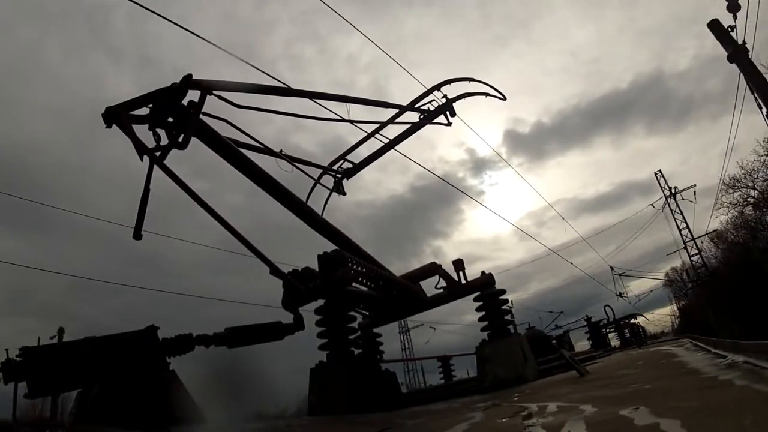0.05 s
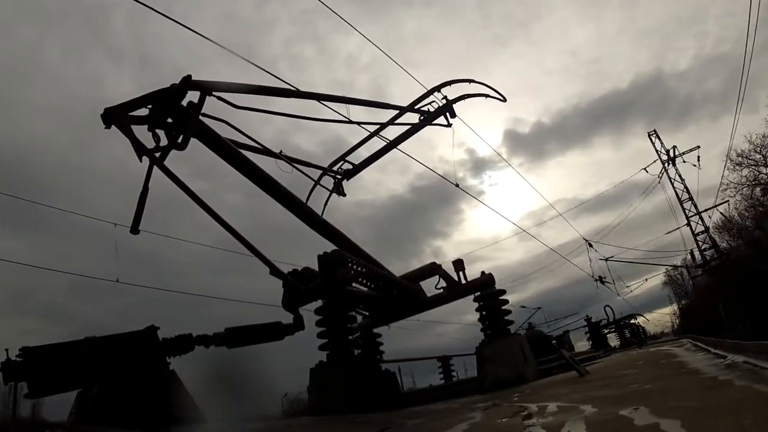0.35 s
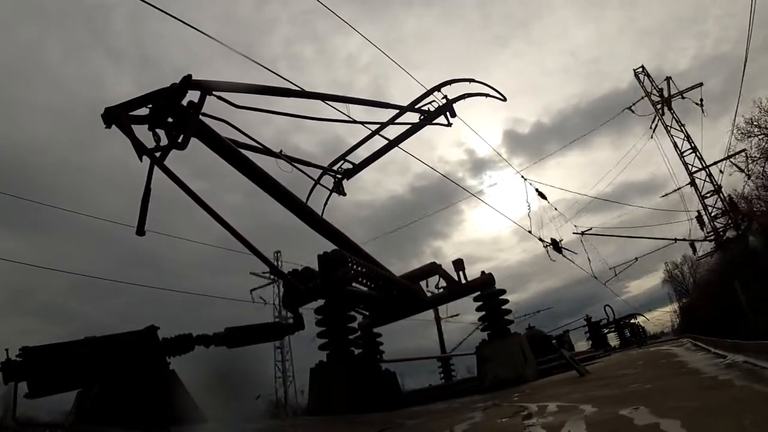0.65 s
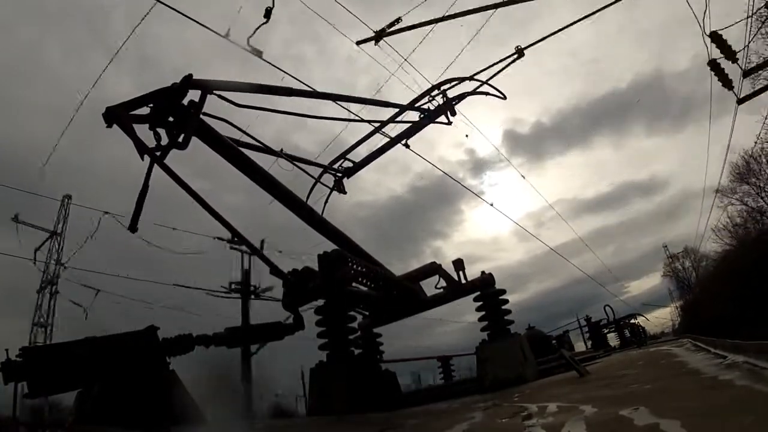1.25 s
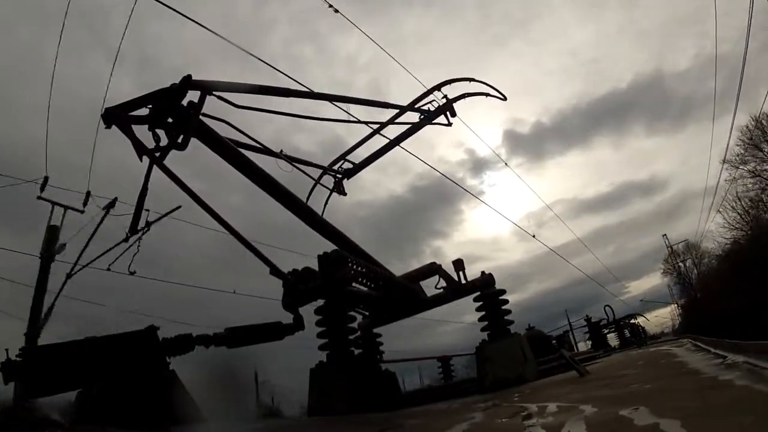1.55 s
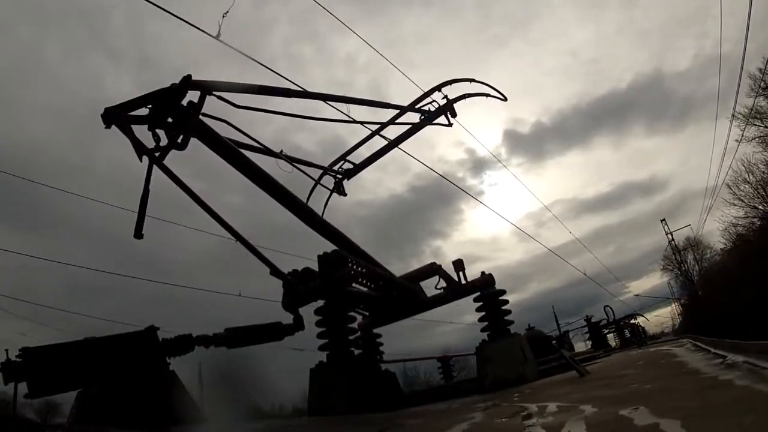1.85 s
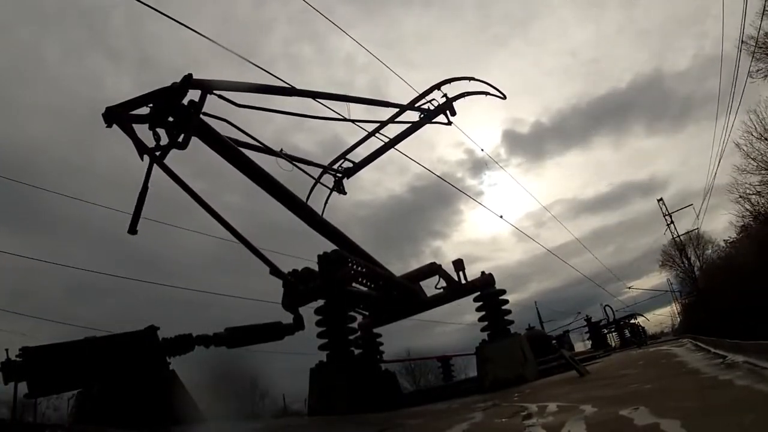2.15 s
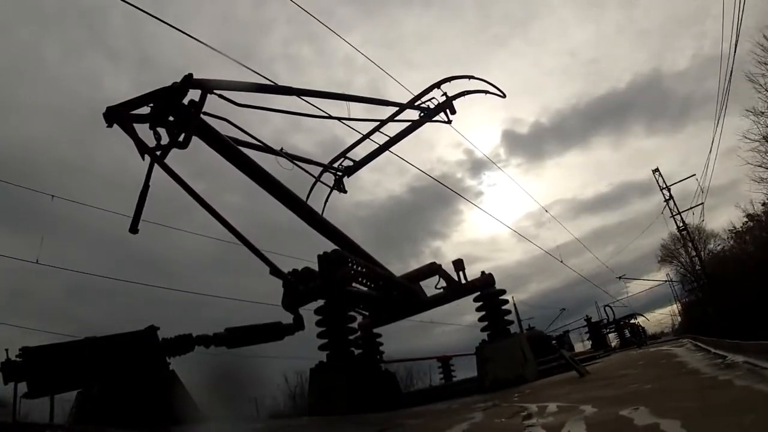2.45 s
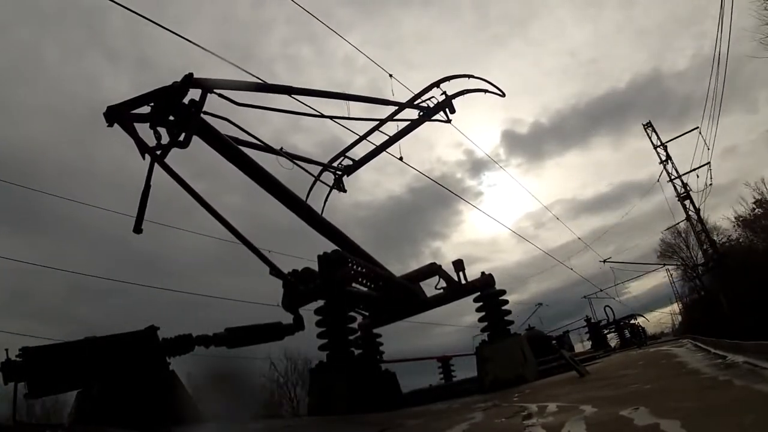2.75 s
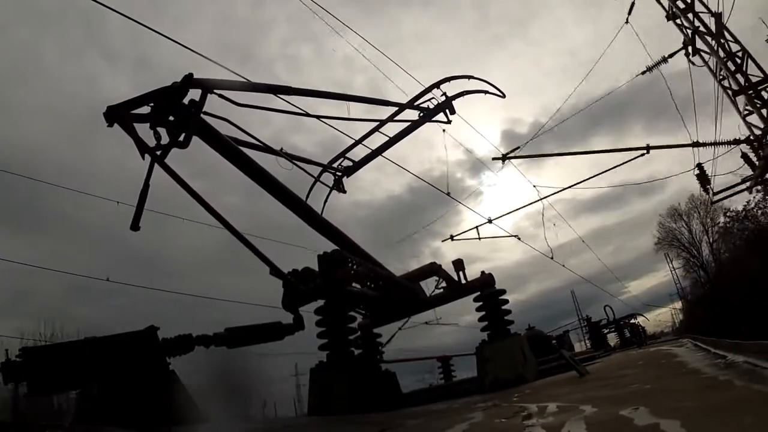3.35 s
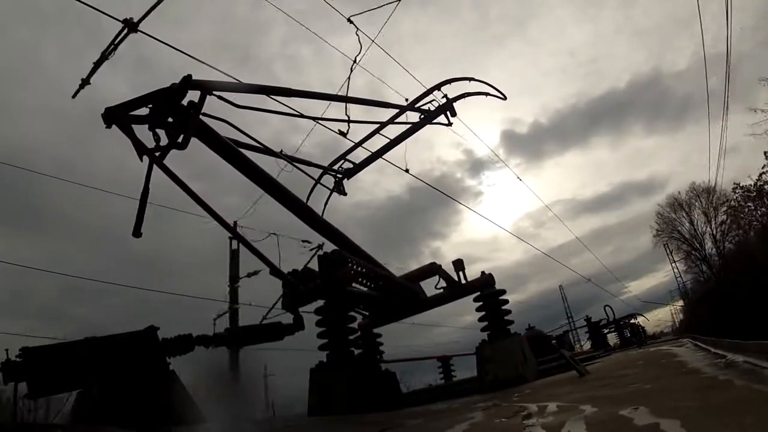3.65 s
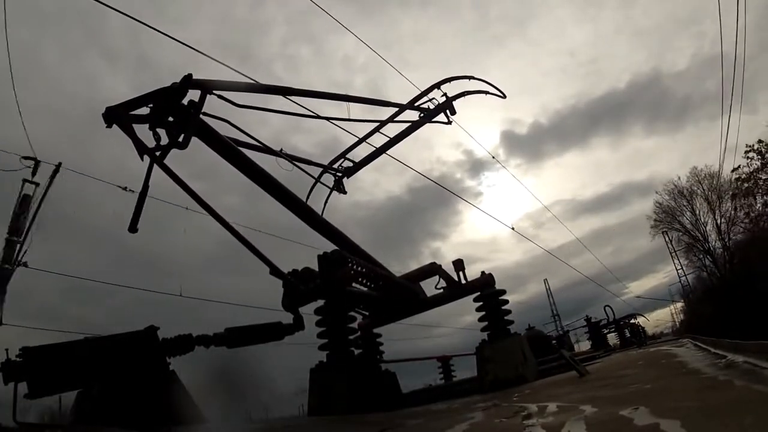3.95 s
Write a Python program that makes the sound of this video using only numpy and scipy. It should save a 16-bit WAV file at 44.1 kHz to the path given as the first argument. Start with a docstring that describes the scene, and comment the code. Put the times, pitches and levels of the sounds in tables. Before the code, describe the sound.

An electric train rushes along in the wind as an arc buzzes briefly and sparks snap.

```python
"""Wind buffets the microphone, wheels and air rush, and the airflow sings near 500 Hz in the roof gear
of a moving electric train. The pantograph scrapes faintly along the overhead wire. After a second it
draws an arc that buzzes at twice the mains rate, crackles and sizzles; each discharge heats the air
into a pop. A few lone sparks snap, most of them later on.
A limiter ducks the level after the loudest cracks."""
import sys
import numpy as np
from scipy import signal
from scipy.fft import rfft, irfft
from scipy.io import wavfile

SR = 44100
rng = np.random.default_rng(int(sys.argv[2]) if len(sys.argv) > 2 else 0)


def digitize_waveform(pressure):
    """Quantize a signal to 16-bit integers and store it at the path in sys.argv[1].

    Rows of a 2-D input are taken as channels; values are limited to [-1, 1].
    """
    field = np.atleast_2d(pressure).T
    bounded = np.clip(field, -1, 1)
    quanta = np.round(bounded * 32767).astype(np.int16)
    wavfile.write(sys.argv[1], SR, quanta)


N = 176400

# strength of the arc: (time [s], level [dB])
ARC_STRENGTH = [(1.09, -32), (1.102, -3), (1.114, -12), (1.128, -1.5), (1.142, -18), (1.153, 0.5),
                (1.176, 3), (1.2, 3), (1.217, 9.5), (1.23, -2.5), (1.255, 1), (1.275, -0.5), (1.303, 4.5),
                (1.31, -23)]
# dull pop of heated air: (frequency [Hz], relative spectral level [dB])
POP_SPECTRUM = [(40, -6), (100, 7.5), (200, -0.5), (340, 3.5), (660, 0), (1100, 3.5), (1280, -5),
                (1480, -18.5), (2200, -23), (2800, -15.5), (3700, -39), (15000, -94)]
# thin treble of sparks and sliding contact: (frequency [Hz], relative spectral level [dB])
SPARK_SPECTRUM = [(500, -23), (2200, -16), (3200, 0), (3750, -1.5), (4600, 2), (5500, -3.5), (6400, -14),
                  (7700, -5), (9200, -19.5), (11200, -15.5), (13000, -21.5), (15000, -35.5)]
BUZZ_HZ, BUZZ_START_S = 102, 1.0975


def arc():
    """Periodic re-ignition: a pop on each half cycle of the mains makes a buzz, amid random crackle."""
    pops, jitter_s, crackles_per_s = 24, .00003, 1800
    strength = gated_gain(ARC_STRENGTH)
    chance = rng.standard_normal(size=(pops, 2))
    times = BUZZ_START_S + np.arange(pops) / BUZZ_HZ + jitter_s * chance[:, 0]
    buzz = -clicks(times, from_db(-3 + 0.6 * chance[:, 1]))
    sizes = from_db(1.5 * np.minimum(rng.exponential(1, N), 3)) * rng.choice([-1, 1], N)
    impulses = sizes * (rng.random(N) < crackles_per_s / SR)
    crackle = from_db(-18) * rms_one(coloured(impulses, POP_SPECTRUM))
    return coloured(buzz * strength, POP_SPECTRUM) + strength * crackle


def burning_arc():
    """Superposition: the arc's buzz and sizzle add to its separate loud cracks."""
    # treble of the cracks and the sizzle: (frequency [Hz], relative spectral level [dB])
    crack_spectrum = [(300, -33), (1500, -10), (2250, -3), (2700, 4), (3200, 2.5), (3700, -6), (5500, -5),
                      (6400, -8), (7000, -14.5), (9000, -23.5), (11200, -24.5), (15000, -38)]
    # cracks of the arc: (time [s], sharp crack level [dB], dull pop level [dB])
    cracks = [(1.0115, -27, -38), (1.0222, -20, -15), (1.0332, -19.5, -18), (1.1022, -21, -9),
              (1.1124, -22, -7), (1.1312, -26, -6), (1.1522, -18, -17), (1.1698, -19, -11),
              (1.2208, -23, 6), (1.2417, -17.5, -13), (1.293, -33, -14), (1.3022, -11.5, 2.5)]
    return arc() + sizzle(crack_spectrum) + discharges(cracks, crack_spectrum)


def sizzle(spectrum):
    """Amplitude-modulated noise: the arc sizzles most between pops, and two bands flicker separately."""
    # envelope of the sizzle: (time [s], level [dB])
    sizzle_level = [(1.095, -35), (1.112, -39), (1.142, -41), (1.152, -37), (1.19, -30.5), (1.222, -25.5),
                    (1.235, -34.5), (1.275, -27), (1.3, -29), (1.31, -51)]
    depth, split_hz, flicker_db = 0.46, 4100, 5.5
    t = np.arange(N) / SR
    pulsing = 1 - depth * np.cos(2 * np.pi * BUZZ_HZ * (t - BUZZ_START_S))
    spits = 0
    for side in ("low", "high"):
        flicker = from_db(flicker_db * np.minimum(drift(rate_hz=280), 2))
        band = signal.butter(2, split_hz, side, fs=SR, output="sos")
        spits = spits + signal.sosfilt(band, flicker * rng.standard_normal(N))
    return gated_gain(sizzle_level) * rms_one(coloured(spits * pulsing, spectrum))


def hum_and_bark():
    """Thermal expansion: the pulsing column of hot air hums, and barks unsteadily as it flares."""
    # flares of the discharge: (time [s], half length [s], level [dB])
    flares = [(1.1148, 0.0031, -8.5), (1.219, 0.0071, -18)]
    t = np.arange(N) / SR
    hum = -from_db(-22.5) * gated_gain(ARC_STRENGTH) * np.cos(2 * np.pi * BUZZ_HZ * (t - BUZZ_START_S))
    bark_hz = 1025 + 190 * drift(rate_hz=350)
    bark = np.sin(2 * np.pi * np.cumsum(bark_hz) / SR)
    return hum + bark * sum(swell(*row) for row in flares)


def lone_sparks():
    """Impulsive sources: isolated discharges snap, thinner in tone than the cracks of the arc."""
    # sparks: (time [s], sharp snap level [dB], dull pop level [dB])
    sparks = [(.5735, -33, -54), (2.3902, -24.5, -8), (2.4017, -27.5, -2), (2.4042, -29.5, -11.5),
              (2.8456, -31.5, -51), (2.8553, -31, -35), (2.859, -28, -40), (3.1705, -28, -48)]
    return discharges(sparks, SPARK_SPECTRUM)


def discharges(rows, spectrum):
    """Sudden heating launches a pressure pulse: each discharge spits twice and makes the air pop."""
    decay_s, restrike_s, restrike_db = 0.0019, 0.0028, -23
    times, crack_db, pop_db = np.transpose(rows)
    t = np.arange(SR // 20) / SR
    restrike = from_db(restrike_db) * (t > restrike_s) * np.exp(-np.abs(t - restrike_s) / decay_s)
    spit = np.exp(-t / decay_s) + restrike
    envelope = signal.fftconvolve(clicks(times, from_db(crack_db)), spit)[:N]
    bursts = envelope * rng.choice([-1, 1], N)
    cracks = coloured(bursts, spectrum) / np.linalg.norm(response(spectrum))
    return cracks + coloured(clicks(times, from_db(pop_db)), POP_SPECTRUM)


def pings():
    """Damped resonance: three sparks as the arc starts and one later ring with a short metallic ping."""
    # onsets of the ring: (time [s], level [dB])
    strikes = [(1.0219, -20), (1.0326, -24), (1.1115, -15), (2.4017, -25)]
    ring_hz, t60_s = 3040, .016
    times, db = np.transpose(strikes)
    radius, angle = from_db(-60 / (t60_s * SR)), 2 * np.pi * ring_hz / SR
    poles = [1, -2 * radius * np.cos(angle), radius * radius]
    return signal.lfilter([0, np.sin(angle)], poles, clicks(times, from_db(db)) + 1e-18)


def scattered(x):
    """Scattering: the roof gear adds a short, dense tail of reflections to the direct sound."""
    tail_db, t60_s = -17, 0.046
    t = np.arange(SR // 4) / SR
    tail = rng.standard_normal(len(t)) * from_db(-60 * t / t60_s)
    return x + from_db(tail_db) * signal.fftconvolve(x, tail / np.linalg.norm(tail))[:N]


def wind():
    """Turbulent pressure at the microphone: a low, lumpy buffeting, with thumps from single eddies."""
    # envelope of the buffeting: (time [s], relative level [dB])
    buffet_level = [(0, -24.5), (.4, -26.5), (.88, -28), (.99, -29.5), (1.04, -26), (1.2, -30.5),
                    (1.35, -22.5), (2.15, -21), (2.85, -19), (3.1, -21.5), (3.18, -21.5), (3.48, -21),
                    (4, -21)]
    # buffeting: (frequency [Hz], relative spectral level [dB])
    buffet_spectrum = [(15, -4), (45, 0), (98, -5.5), (122, -9.5), (165, -10), (240, -16), (400, -21.5),
                       (900, -48.5), (15000, -110)]
    # passing eddies: (time [s], level [dB])
    eddies = [(0.206, -19), (1.521, -18), (1.6, -16.5), (1.846, -15), (2.059, -15), (2.26, -15),
              (2.869, -15.5), (3.22, -14)]
    # thump of an eddy: (frequency [Hz], relative spectral level [dB])
    eddy_spectrum = [(30, -13.5), (70, 3.5), (180, 3), (400, -10), (1200, -51), (15000, -110)]
    lumpy = rms_one(noise(buffet_spectrum) * from_db(0.4 * drift(rate_hz=15)))
    buffet = from_db(in_time(buffet_level) + 4.5) * lumpy
    thumps = noise(eddy_spectrum) * sum(swell(s, half_s=0.0092, db=db) for s, db in eddies)
    return buffet + thumps


def running():
    """Rolling and flow noise: wheels and body roar under a hiss of air, and both flutter together."""
    # envelope of the roar: (time [s], level [dB])
    roar_level = [(0, -22), (.5, -21.5), (1.0, -21), (1.3, -19.5), (1.37, -22.5), (1.5, -22.5),
                  (2.0, -22.5), (2.11, -26.5), (2.2, -20.5), (2.5, -24.5), (2.61, -24.5), (2.75, -22.5),
                  (3.2, -22.5), (3.73, -21.5), (3.78, -26.5), (3.88, -21.5), (4, -25)]
    # wheels and body: (frequency [Hz], relative spectral level [dB])
    roar_spectrum = [(100, -4.5), (200, -5), (290, -5), (345, -9.5), (440, 1.5), (520, 2), (555, -7),
                     (595, -1), (690, -7.5), (810, -2), (920, -8.5), (1080, -9), (1250, -16), (1450, -29),
                     (2200, -38.5), (4000, -72), (15000, -110)]
    # envelope of the hiss: (time [s], level [dB])
    hiss_level = [(0, -38.5), (.5, -38.5), (1.0, -39.5), (1.3, -40.5), (1.34, -39.5), (1.47, -36.5),
                  (1.58, -38), (1.67, -42), (1.8, -38.5), (2.04, -38.5), (2.11, -42), (2.19, -38),
                  (2.6, -41), (2.8, -38.5), (2.96, -40), (3.2, -38), (3.74, -38.5), (3.765, -43.5),
                  (3.86, -37.5), (4, -39)]
    # rushing air: (frequency [Hz], relative spectral level [dB])
    hiss_spectrum = [(600, -17), (1200, 4.5), (1500, 2.5), (1800, 5), (2300, -5.5), (2900, -3), (3600, -9),
                     (4400, -8.5), (5300, -14), (6100, -19), (9000, -25.5), (12500, -35.5), (13500, -39.5),
                     (15000, -48)]
    flutter = drift(rate_hz=23.4)
    roar = noise(roar_spectrum) * from_db(in_time(roar_level) + 0.84 * flutter)
    hiss = noise(hiss_spectrum) * from_db(in_time(hiss_level) + 0.96 * flutter)
    return roar + hiss


def singing():
    """Flow-induced tone: air sings unsteadily in the roof gear, inside a narrow band of turbulence."""
    # pitch of the tone: (time [s], frequency [Hz])
    pitch = [(0, 502), (.28, 493), (.5, 502), (.65, 494), (.85, 500), (1.0, 497), (1.2, 504), (1.38, 494),
             (1.7, 502), (2.1, 497), (2.45, 501), (2.8, 490), (3.15, 503), (3.3, 488), (3.5, 500), (4, 501)]
    # envelope of the tone: (time [s], level [dB])
    tone_level = [(0, -23.5), (.2, -32.5), (.45, -20.5), (.65, -28), (.9, -24), (1.14, -21), (1.38, -29),
                  (1.55, -26), (1.75, -22), (1.9, -33), (1.98, -20), (2.15, -35.5), (2.35, -28.5),
                  (2.5, -21), (2.64, -29.5), (3.1, -26.5), (3.35, -28.5), (3.72, -24), (3.8, -32), (4, -26)]
    jitter_hz, waver_db, halo_width_hz, halo_db = 3.174, 0.5, 39, -30
    phase = 2 * np.pi * np.cumsum(in_time(pitch) + jitter_hz * drift(rate_hz=17.3)) / SR
    tone = rms_one(np.sin(phase) * from_db(waver_db * drift(rate_hz=7.6)))
    halo = rms_one(drift(halo_width_hz) * np.sin(phase) + drift(halo_width_hz) * np.cos(phase))
    return from_db(in_time(tone_level)) * tone + from_db(halo_db) * halo


def scraping():
    """Sliding friction: the collector strip rubs along the wire in faint, gritty swells of hiss."""
    # scrapes: (time [s], half length [s], level [dB])
    scrapes = [(0.038, 0.012, -50), (0.18, 0.018, -47), (0.477, 0.021, -49.5), (1.342, 0.028, -47),
               (2.054, .015, -51), (2.44, 0.013, -49), (3.212, 0.029, -50), (3.73, 0.034, -53)]
    grains = rng.standard_normal(N) * from_db(3 * drift(rate_hz=200))
    grit = rms_one(coloured(grains, SPARK_SPECTRUM))
    return grit * sum(swell(*row) for row in scrapes)


def from_db(db):
    """Amplitude ratio of a level in decibels."""
    return 10 ** (np.asarray(db) / 20)


def rms_one(x):
    """Normalisation to unit power."""
    return x / np.sqrt(np.mean(x ** 2) + 1e-20)


def in_time(rows):
    """Linear interpolation of (time [s], value) rows."""
    return np.interp(np.arange(N) / SR, *np.transpose(rows))


def gated_gain(rows):
    """Amplitude envelope from (time [s], level [dB]) rows, silent outside their span."""
    t = np.arange(N) / SR
    return from_db(in_time(rows)) * (t > rows[0][0]) * (t < rows[-1][0])


def swell(peak_s, half_s, db):
    """Gaussian envelope; the half length is its standard deviation."""
    return from_db(db) * np.exp(-.5 * ((np.arange(N) / SR - peak_s) / half_s) ** 2)


def drift(rate_hz):
    """Random fluctuation of unit power: noise through a two-pole low-pass at rate_hz."""
    hop, settle = 40, 2000
    pole = np.exp(-2 * np.pi * hop * rate_hz / SR)
    white = rng.standard_normal(N // hop + settle + 2)
    slow = signal.lfilter([1], [1, -2 * pole, pole * pole], white)[settle:]
    return np.interp(np.arange(N) / hop, np.arange(len(slow)), rms_one(slow))


def response(spectrum, size=8192):
    """Minimum-phase impulse response with the given spectrum and a peak of 1."""
    hz, db = np.transpose(spectrum)
    grid_hz = np.maximum(np.arange(size // 2 + 1) * SR / size, 1)
    magnitude = from_db(np.interp(np.log(grid_hz), np.log(hz), db))
    cepstrum = irfft(np.log(magnitude))
    cepstrum[1:size // 2] *= 2  # folding the cepstrum makes the response causal
    cepstrum[size // 2 + 1:] = 0
    impulse = irfft(np.exp(rfft(cepstrum)))[:size // 2]
    return impulse / np.abs(impulse).max()


def coloured(x, spectrum):
    """Convolution: every click in x rings with the given spectrum."""
    return signal.fftconvolve(x, response(spectrum))[:N]


def noise(spectrum):
    """Stationary noise of unit power with the given spectrum."""
    impulse = response(spectrum)
    white = rng.standard_normal(N + len(impulse) - 1)
    return rms_one(signal.fftconvolve(white, impulse, "valid"))


def clicks(times, gains):
    """Impulse train with one click at each time."""
    out = np.zeros(N)
    np.add.at(out, np.clip((times * SR).astype(int), 0, N - 1), gains)
    return out


def scene():
    """Superposition of all sources at one microphone on the roof."""
    electric = burning_arc() + lone_sparks() + pings()
    background = wind() + running() + singing() + scraping()
    return (scattered(electric) + hum_and_bark() + background)[None]


def record(dry):
    """Peak limiting with a fast attack and slow release, then soft clipping and a low-pass filter."""
    threshold_db, attack_s, release_db_per_s, cutoff_hz = -1, 0.0013, 23.5, 15200
    over_db = np.maximum(20 * np.log10(np.abs(dry[0]) + 1e-9) - threshold_db, 0)
    release_db = release_db_per_s * np.arange(N) / SR
    held_db = np.maximum.accumulate(over_db + release_db) - release_db
    pole = np.exp(-1 / (attack_s * SR))
    duck_db = signal.lfilter([1 - pole], [1, -pole], held_db)
    limited = dry * from_db(-duck_db)
    rounded = limited / (1 + limited ** 8) ** (1 / 8)
    return signal.sosfilt(signal.ellip(10, .1, 80, cutoff_hz, fs=SR, output="sos"), rounded)


dry = scene()
out = record(dry)
digitize_waveform(out)
```